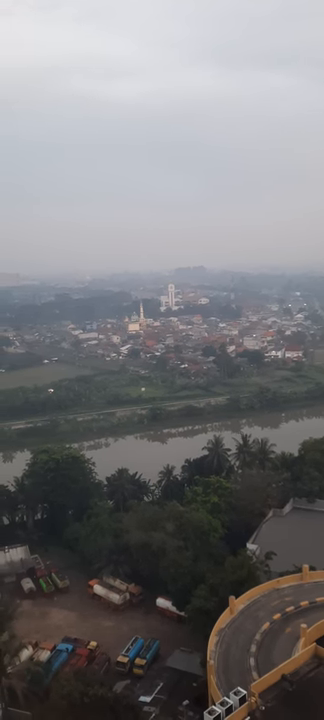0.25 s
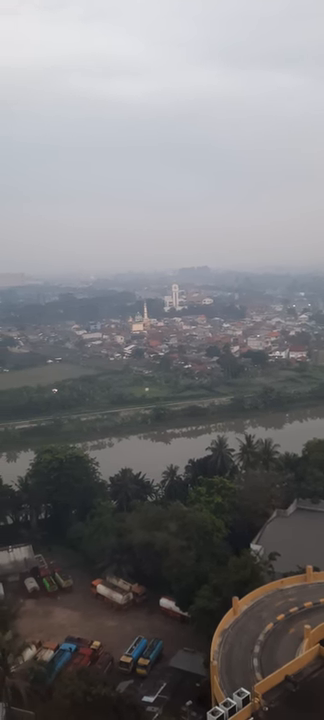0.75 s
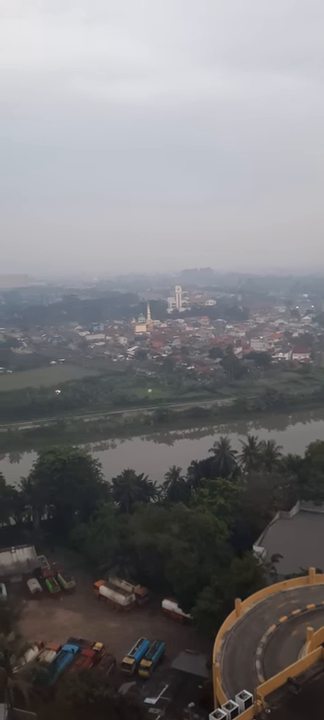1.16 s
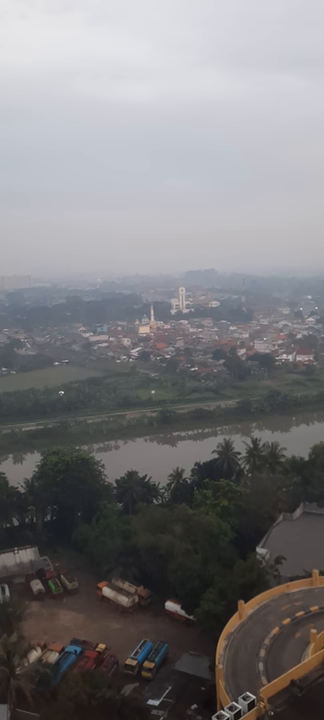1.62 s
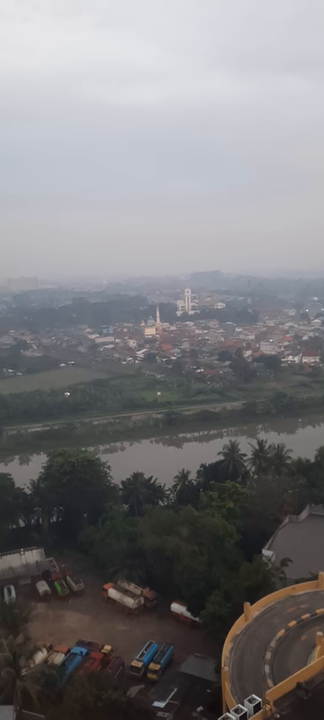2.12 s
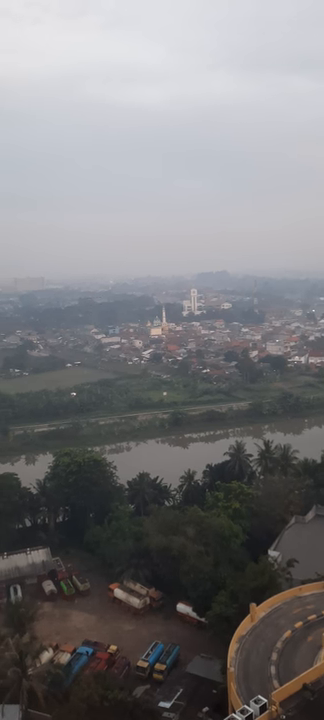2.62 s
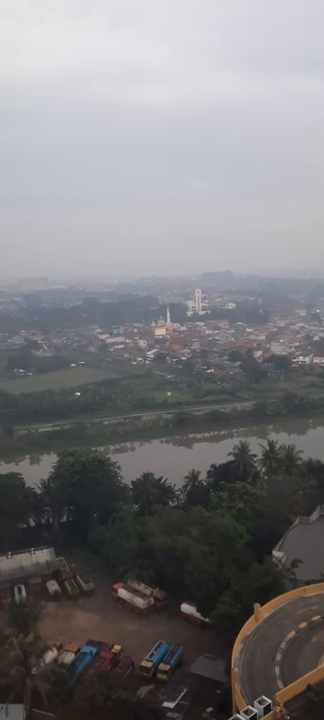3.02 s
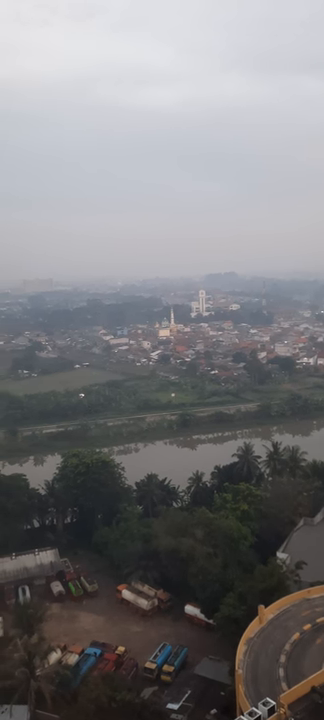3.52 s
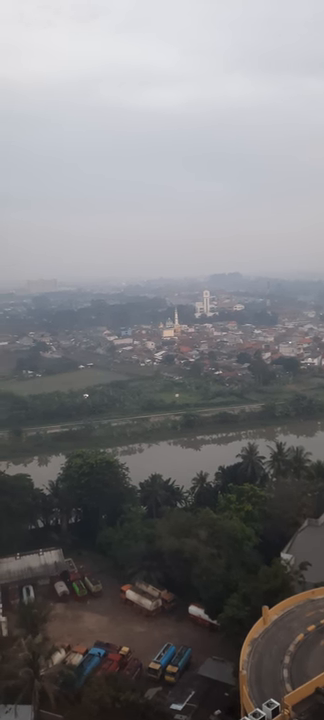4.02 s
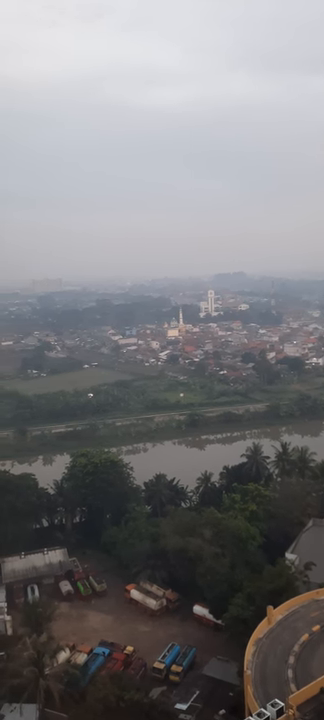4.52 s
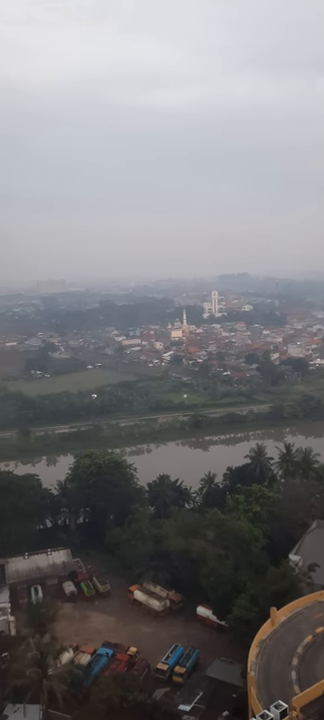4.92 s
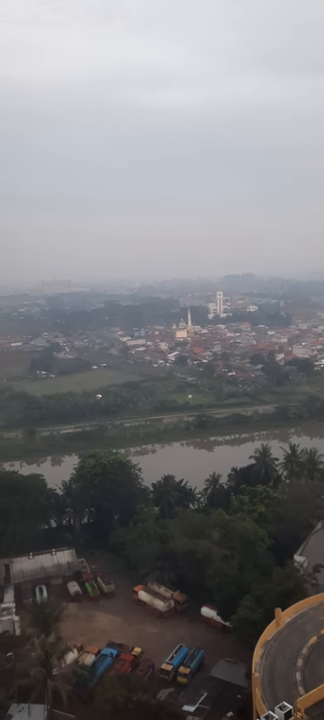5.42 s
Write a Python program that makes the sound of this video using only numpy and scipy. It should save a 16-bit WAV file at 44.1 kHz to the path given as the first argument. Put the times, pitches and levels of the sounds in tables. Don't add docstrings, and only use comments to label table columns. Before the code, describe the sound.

From a high balcony, deep throbbing compressor drone and muffled town rumble run steadily; a tiny click and thin air hiss appear left.

```python
import sys
import numpy as np
from scipy import signal
from scipy.fft import rfft, irfft, next_fast_len
from scipy.io import wavfile

SR = 44100
rng = np.random.default_rng(int(sys.argv[2]) if len(sys.argv) > 2 else 0)


def transcribe(signal):
    frames = np.atleast_2d(signal).T
    limited = np.clip(frames, -1, 1)
    pcm = np.round(limited * 32767).astype(np.int16)
    wavfile.write(sys.argv[1], SR, pcm)


def magnitude_from_level(level_db):
    exponent = np.asarray(level_db, float) / 20
    return 10 ** exponent


N = 249606

# frequency_hz, density_db (dB per Hz)
TOWN_DENSITY = [(18, -82), (36, -76.5), (48, -63), (68, -59.5), (105, -63), (130, -64.5), (145, -67.5),
                (200, -54.5), (230, -60), (310, -59), (328, -69.5), (385, -66.5), (450, -71.5), (545, -78),
                (600, -73), (780, -75), (1000, -81.5), (1200, -81.5), (1600, -82), (2070, -88.5), (2900, -97),
             (3500, -104), (4500, -107), (6000, -111), (7700, -117), (8700, -115), (9600, -121),
             (14000, -118)]
# frequency_hz, coherence (0-1)
COHERENCE = [(40, .995), (180, .975), (310, .9), (430, .65), (560, .3), (700, .7), (1100, .5), (1340, .25),
             (1600, .5), (1900, .15), (2250, .4), (3000, .25), (4000, .12), (16000, .05)]
# frequency_hz, lead_rad
LEFT_LEAD = [(0, 0), (200, .12), (430, .5), (690, .8), (850, 2.1), (1050, 2.9), (1600, 3.7), (2200, 6.3),
             (3100, 8.3)]
# frequency_hz, left_minus_right_db
TOWN_TILT = [(60, 0.5), (92, 3.5), (140, -1), (220, 0), (330, 6.5), (500, 7), (770, 3.5), (1180, 5),
             (1810, 5.0), (2770, 9),
             (3600, 10), (4500, 4), (7200, 6.5), (8800, 1.6), (10500, 0.6), (16000, 2.5)]
# time_s, middle_db, or time_s, level_db where one column follows
TRAFFIC_SWELL = [
    (0, -48.5),
    (.7, -48.5),
    (1.3, -50),
    (2.0, -48.5),
    (2.7, -47.5),
    (3.6, -48),
    (4.3, -48),
    (4.9, -49),
    (5.66, -50),
]
# pitch_hz, width_hz, level_db (rms), left_minus_right_db
FAR_TONES = [(55.56, 2.4, -47.5, 0.5), (76.8, 6.6, -46.5, 4.5), (96.1, 9, -48.5, 4),
             (146.27, 4.4, -44, 6.5), (207.8, 1.4, -50, 2.5), (314.9, 5.9, -49, 7), (532, 7.2, -66.5, 3.5),
             (389, 19, -55, 2), (572, 52, -64, 5), (633, 3.3, -66, 10), (783, 39, -60, -6.5),
             (1193, 5.2, -76, -1.5), (1356, 15, -66.5, 3.5), (2054, 12, -80, 5), (3130, 370, -82, 5),
             (3950, 230, -88.5, 8.5), (5150, 480, -91.5, 11)]
# peak_s, level_db, half_length_s, centre_hz, left_minus_right_db
AIR_PUFFS = [
    (0.537, -71.5, .023, 5300, 23.5),
    (.2, -78, .2, 3100, 8),
    (0.786, -81, .05, 5000, -5),
    (1.9, -72, 0.047, 3750, 11),
    (2.52, -83, .08, 7460, -9),
    (4.4, -77, .06, 4480, 0.5),
    (4.598, -79, 0.14, 5400, 13),
    (4.92, -84.5, 0.13, 5400, 4),
]
# centre_hz, width_hz, left_minus_right_db, flutter_db
VALVE_WHISTLES = [
    (9800, 300, 14, 1.4),
    (10950, 880, 12.5, 1),
]
# burst_db, fall_db_per_s, held_db, surge_gain (dB per dB of surge)
VALVE_BLOWDOWN = [
    (-80, 37, -91.5, 1.01),
    (-73.5, 32.5, -90, -0.2),
]
# time_s, rise_db
PRESSURE_SURGES = [
    (2.6, 3),
    (3.02, 8),
    (3.4, 2.5),
    (3.97, 3.5),
]
# time_s, below_order_hz
ENGINE_HUNT = [
    (0, 2.4),
    (.9, .7),
    (1.25, .7),
    (1.6, 2.55),
    (2.75, 2.5),
    (3.15, -.7),
]
# order, above_hz, in_step_s, level_db (rms), left_minus_right_db
NEIGHBOUR_TONES = [(3, 2.99, .269, -47.6, 3.5), (6, 1.59, .126, -44.3, 3.8)]
# shaft_hz, start_angle_rad
SHAFTS = [(48.492, -2.64), (48.906, 1.81)]
# order, level_db (rms), left_minus_right_db, phase_sway_rad
FIRST_ORDERS = [(1, -32.5, -0.5, 0.16), (2, -33.5, 3.5, 0.12), (3, -36, 4.5, 0.13), (4, -34, 3, 1.1),
                (5, -50, -3.5, 1.1), (6, -41.5, 1.5, .9), (7, -48, -5, 0.04), (9, -61.5, 5.5, 0.44),
                (10, -67.5, 3.5, .5)]
# order, level_db (rms), left_minus_right_db, phase_sway_rad
SECOND_ORDERS = [(1, -30, -1.6, 0.0029), (2, -51.5, 2.5, 0.0078), (7, -63, -2, 0.0045), (9, -54.5, 7.5, 0)]

MIDDLE_FOLLOWS, TREBLE_FOLLOWS = 1, 0.85
PUFF_CYCLES = 88
TICK_S, TICK_DB, TICK_HZ = 2.312, -65, 10200
OPEN_S, FULL_S, SHUT_S = 2.37, 2.48, 4.15
RISE_DB_PER_S, CLOSE_DB_PER_S = 131, 27
LEAK_DB = -5
SURGE_S = 0.1
ENGINE_START_TURNS, ENGINE_DB = .36, -36.5
LEAVES_S, LEAVES_DB_PER_S = 2.8, 9
SWAY_HZ, SWAY_START_S = .54, .38
SMEAR_RAD = 1.3


def rms_one(x):
    return x / np.sqrt(np.mean(x ** 2) + 1e-20)


def panned(x, pan_db):
    return x * magnitude_from_level(np.array([[pan_db / 2], [-pan_db / 2]]))


def in_time(rows):
    times_s, *columns = np.transpose(rows)
    return [np.interp(np.arange(N) / SR, times_s, column) for column in columns]


def at_hz(points, hz):
    table_hz, values = np.array(points)[:, 0], np.array(points)[:, 1]
    return np.interp(np.log(hz + 1), np.log(table_hz + 1), values)


def drift(rate_hz):
    step = 40
    pole = np.exp(-2 * np.pi * rate_hz * step / SR)
    noise = rng.standard_normal(N // step + 2002)
    slow = signal.lfilter([1], [1, -2 * pole, pole * pole], noise)[2000:]
    return np.interp(np.arange(N) / step, np.arange(len(slow)), rms_one(slow - slow.mean()))


def resonance(x, hz, width_hz):
    r = np.exp(-np.pi * width_hz / SR)
    return signal.lfilter([1 - r, 0, r - 1], [1, -2 * r * np.cos(2 * np.pi * hz / SR), r * r], x)


def town(patchy_db):
    size = next_fast_len(N)
    hz = np.arange(size // 2 + 1) * SR / size
    density = magnitude_from_level(at_hz(TOWN_DENSITY, hz)) * np.sqrt(SR / 2)
    left, own = rfft(rng.standard_normal((2, size))) * density

    coherence = np.clip(at_hz(COHERENCE, hz), 0, 1)
    common = left * np.exp(-1j * at_hz(LEFT_LEAD, hz))
    right = coherence * common + np.sqrt(1 - coherence ** 2) * own
    half_tilt_db = at_hz(TOWN_TILT, hz) / 2
    pair = np.array([left * magnitude_from_level(half_tilt_db), right * magnitude_from_level(-half_tilt_db)])

    busy_db, = in_time(TRAFFIC_SWELL)
    busy_db = busy_db - busy_db.mean()
    middle_db = MIDDLE_FOLLOWS * busy_db
    treble_db = TREBLE_FOLLOWS * busy_db
    swells_db = [0, 0, 0, 0, middle_db, middle_db, middle_db, treble_db, .6 * treble_db, 0]
    octave_of_hz = np.clip(np.log2(hz / 31.25 + 1e-9), 0, 9)
    out = 0
    for octave, swell_db in enumerate(swells_db):
        share = np.clip(1 - abs(octave_of_hz - octave), 0, 1)
        patches = drift(3.1) + .7 * drift(6.9)
        gain = magnitude_from_level(swell_db + patchy_db * patches)
        out = out + gain * irfft(pair * share, size)[:, :N]
    return out


def far_machines():
    out = 0
    for hz, width_hz, level_db, pan_db in FAR_TONES:
        once = resonance(rng.standard_normal((2, N + SR)), hz, width_hz)
        left, own = resonance(once, hz, width_hz)[:, SR:]
        coherence = at_hz(COHERENCE, hz)
        right = coherence * left + np.sqrt(1 - coherence ** 2) * own
        out = out + panned(magnitude_from_level(level_db) * rms_one(np.array([left, right])), pan_db)
    return out


def puffs():
    t = np.arange(N) / SR
    out = 0
    for peak_s, level_db, half_length_s, hz, pan_db in AIR_PUFFS:
        hump = np.exp(-((t - peak_s) / half_length_s) ** 2)
        width_hz = PUFF_CYCLES / half_length_s
        once = resonance(rng.standard_normal((2, N)), hz, width_hz)
        jet = rms_one(resonance(once, hz, width_hz))
        out = out + panned(magnitude_from_level(level_db) * hump * jet, pan_db)
    return out


def valve_tick():
    click = np.full(N, 1e-18)
    click[round(TICK_S * SR)] = magnitude_from_level(TICK_DB + 25)
    once = resonance(click, TICK_HZ, 895)
    return panned(resonance(once, TICK_HZ, 895), pan_db=10)


def valve_hiss():
    t = np.arange(N) / SR
    surge_db = sum(rise_db * np.exp(-((t - s) / SURGE_S) ** 2) for s, rise_db in PRESSURE_SURGES)
    closing = (t > TICK_S) * magnitude_from_level(-CLOSE_DB_PER_S * np.maximum(t - SHUT_S, 0))
    out = 0
    for blowdown, whistle in zip(VALVE_BLOWDOWN, VALVE_WHISTLES):
        burst_db, fall_db_per_s, held_db, surge_gain = blowdown
        hz, width_hz, pan_db, flutter_db = whistle
        below_peak_db = np.maximum(RISE_DB_PER_S * (FULL_S - t), fall_db_per_s * (t - FULL_S))
        burst = magnitude_from_level(burst_db - below_peak_db)
        held = magnitude_from_level(held_db + LEAK_DB * (t < OPEN_S))
        edges_hz = [hz - width_hz / 2, hz + width_hz / 2]
        band = signal.butter(2, edges_hz, "band", fs=SR, output="sos")
        noise = rms_one(signal.sosfilt(band, rng.standard_normal(N)))
        unsteady = magnitude_from_level(surge_gain * surge_db + flutter_db * drift(30))
        out = out + panned(closing * np.hypot(burst, held) * unsteady * noise, pan_db)
    return out


def order_angle(shaft, order):
    shaft_hz, start_rad = shaft
    crank_rad = 2 * np.pi * shaft_hz * np.arange(N) / SR + start_rad
    return round(order) * crank_rad + SMEAR_RAD * round(order) ** 2


def beating_tones():
    t = np.arange(N) / SR
    below_hz, = in_time(ENGINE_HUNT)
    engine_turns = -ENGINE_START_TURNS - np.cumsum(below_hz) / SR
    engine_db = ENGINE_DB - LEAVES_DB_PER_S * np.maximum(t - LEAVES_S, 0)
    tones = [(2, engine_turns, engine_db, 2.5)]
    for order, above_hz, in_step_s, level_db, pan_db in NEIGHBOUR_TONES:
        tones.append((order, above_hz * (t - in_step_s), level_db, pan_db))
    out = 0
    for order, turns_ahead, level_db, pan_db in tones:
        angle = order_angle(SHAFTS[0], order) + 2 * np.pi * turns_ahead
        out = out + panned(np.sqrt(2) * magnitude_from_level(level_db) * np.cos(angle), pan_db)
    return out


def compressor(shaft, orders):
    sway = np.sin(2 * np.pi * SWAY_HZ * (np.arange(N) / SR - SWAY_START_S))
    out = 0
    for order, level_db, pan_db, sway_rad in orders:
        angle = order_angle(shaft, order) + sway_rad * sway
        out = out + panned(np.sqrt(2) * magnitude_from_level(level_db) * np.cos(angle), pan_db)
    return out


def scene():
    background = town(patchy_db=.5) + far_machines()
    air = puffs() + valve_tick() + valve_hiss()
    hum = beating_tones() + compressor(SHAFTS[0], FIRST_ORDERS) + compressor(SHAFTS[1], SECOND_ORDERS)
    return background + air + hum


def roll_off(x):
    return signal.sosfilt(signal.butter(12, 15740, fs=SR, output="sos"), x)


def record(dry):
    return roll_off(dry)


dry = scene()
out = record(dry)
transcribe(out)
```